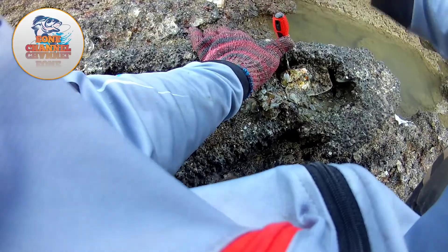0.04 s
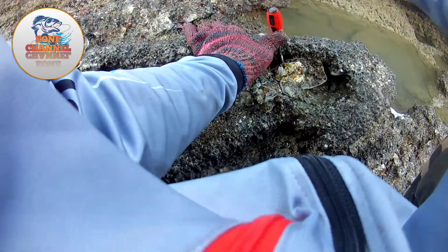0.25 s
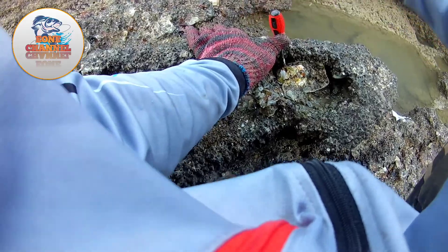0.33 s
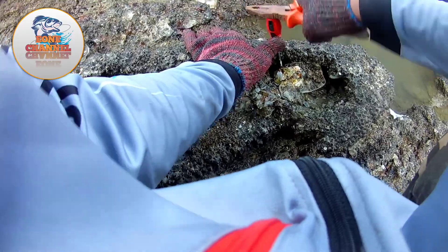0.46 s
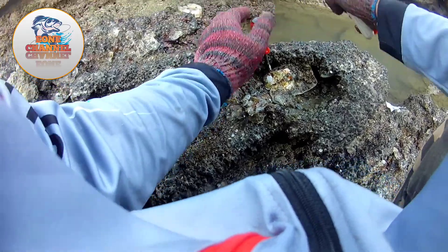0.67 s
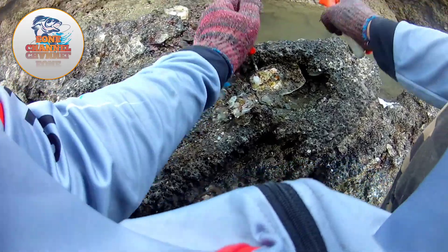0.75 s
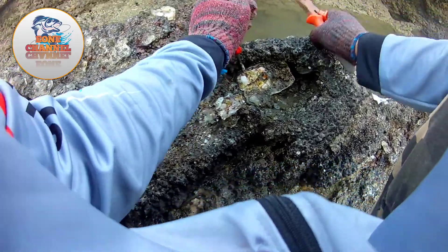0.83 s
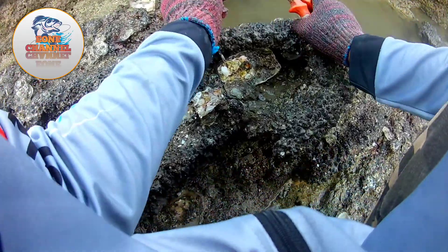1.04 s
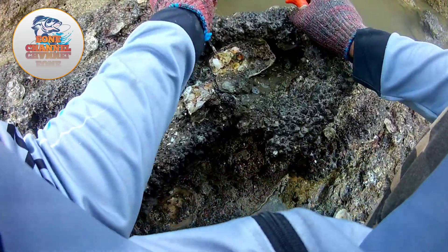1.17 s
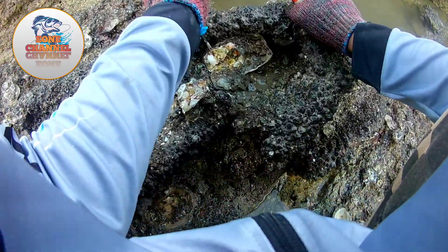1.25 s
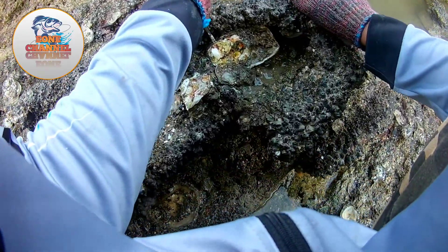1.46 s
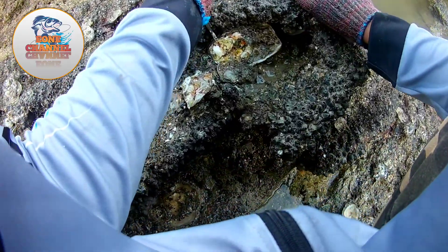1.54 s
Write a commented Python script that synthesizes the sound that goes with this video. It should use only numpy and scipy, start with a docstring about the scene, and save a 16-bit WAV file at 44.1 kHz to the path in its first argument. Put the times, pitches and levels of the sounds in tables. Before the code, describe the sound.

Two sharp, close knocks of a tool on shell, with wind and water rumbling behind.

```python
"""Wind and water rumble on a shore. A hand tool knocks twice on an oyster fixed to a rock, close enough
to overload the microphone: each impact excites damped modes of shell and tool and scatters off the rocks.
Between the blows a bubble resonates in a pool with a plip. Afterwards a faint high rasp and a faint hum
come and go, a few more bubbles ring, and the tool's tip ticks lightly on the shell."""
import sys
import numpy as np
from scipy import signal
from scipy.fft import rfft, irfft
from scipy.io import wavfile
from scipy.ndimage import map_coordinates

SR = 44100
rng = np.random.default_rng(int(sys.argv[2]) if len(sys.argv) > 2 else 0)


def unload_audio(sound):
    """Save the sound as a 16-bit wav file, at the path given as the first command line argument."""
    columns = np.transpose(np.atleast_2d(sound))
    # keep every value between -1 and 1, then stretch to whole-number steps
    steps = np.round(np.clip(columns, -1, 1) * 32767)
    wavfile.write(sys.argv[1], SR, steps.astype(np.int16))


N = 70560
TIME = np.arange(N) / SR


def amp(db):
    """Amplitude ratio of a level in decibels."""
    return 10 ** (np.asarray(db) / 20)


def unit(x):
    """Normalisation to rms 1."""
    return x / np.sqrt(np.mean(x ** 2) + 1e-20)


def along(points, hz):
    """Interpolation on a logarithmic frequency axis."""
    freqs, values = np.transpose(points)
    return np.interp(np.log(hz + 1), np.log(freqs + 1), values)


def level(points):
    """Gain envelope, interpolated in decibels."""
    return amp(np.interp(TIME, *np.transpose(points)))


def filtered(x, response):
    """Zero-phase filtering by a frequency response."""
    mirrored = np.concatenate([x, x[::-1]])
    hz = np.fft.rfftfreq(len(mirrored), 1 / SR)
    return irfft(rfft(mirrored) * response(hz))[:len(x)]


def noise(spectrum):
    """Spectrally shaped noise of rms 1."""
    return unit(filtered(rng.standard_normal(N), lambda hz: amp(along(spectrum, hz))))


def wobble(rate):
    """Smooth random modulation, with rate knots a second."""
    return map_coordinates(rng.standard_normal(N // 8), [TIME * rate], mode="mirror")


def since(start):
    """Seconds elapsed since start, zero before."""
    return np.maximum(TIME - start, 0)


def fade(t, rise, t60):
    """Exponential rise and decay; t60 is the time to fall 60 dB."""
    return (1 - np.exp(-t / rise)) * np.exp(-np.log(1000) * t / t60)


def tilt(hz, db_per_octave, pivot_hz=1500):
    """Spectral slope about a pivot sets the brightness."""
    return amp(db_per_octave * np.log2(np.maximum(hz, pivot_hz / 2) / pivot_hz))


# Spectra of wash and buffeting. Each row: frequency in Hz, relative level in dB.
WASH_SPECTRUM = [(20, -1.5), (45, 0), (80, -2.5), (125, 1.5), (160, -3), (260, -3.5), (310, -4.5),
                 (390, -3.5), (560, -8), (750, -9.5), (1050, -12), (1600, -25.5), (2200, -36), (3200, -43),
                 (4000, -45.5), (6000, -52.5), (9000, -69.5)]
BUFFET_SPECTRUM = [(15, -3), (35, -6.5), (70, 2), (120, -2), (200, -11.5), (600, -48.5), (2000, -120)]
# Their envelopes. Each row: time in seconds, level in dB.
WASH_LEVELS = [(0, -46.5), (0.25, -44), (0.55, -43), (0.72, -44.5), (0.95, -44), (1.15, -41), (1.35, -45),
               (1.6, -45)]
BUFFET_LEVELS = [(0, -56.5), (0.2, -52.5), (0.3, -57), (0.38, -56), (0.5, -46), (0.6, -54.5), (0.71, -45.5),
                 (0.9, -53), (1.1, -52), (1.25, -54), (1.42, -43), (1.5, -52), (1.6, -51.5)]
def shore(swing_db=4):
    """Turbulence: wind and water make a low wash, and pressure fluctuations buffet the microphone."""
    wash = level(WASH_LEVELS) * amp(0.2 * wobble(7.6)) * noise(WASH_SPECTRUM)
    buffeting = unit(noise(BUFFET_SPECTRUM) * amp(swing_db * wobble(28)))
    return wash + level(BUFFET_LEVELS) * buffeting


# Spectrum of the contact. Each row: frequency in Hz, relative level in dB.
CRACK_SPECTRUM = [(200, -5), (1400, 8.5), (2500, -10), (3200, -23.5), (5500, -15.5), (7000, -20.5),
                  (8500, -34), (15000, -37)]
def crack(start, lead_s=0.00045):
    """A brief contact is broadband: a first touch, then the brittle crack of the full blow."""
    touch = amp(-16.5) * noise(CRACK_SPECTRUM) * fade(since(start - lead_s), rise=0.00015, t60=0.001)
    return touch + amp(-7) * noise(CRACK_SPECTRUM) * fade(since(start), rise=0.0004, t60=0.0087)


# Spectrum of the rock under the shell. Each row: frequency in Hz, relative level in dB.
THUD_SPECTRUM = [(25, -9), (60, -5), (115, -4), (200, -11.5), (320, 2), (400, -6.5), (520, 2), (650, -2),
                 (900, -15), (2000, -46)]
def thud(start):
    """Transmission of the impact into the rock gives a dull, damped burst."""
    return noise(THUD_SPECTRUM) * fade(since(start), rise=0.0013, t60=0.067)


# Modes of shell and tool. Each row: frequency in Hz, level in dB, t60 in seconds.
SHELL_MODES = [(103.7, -23.5, 0.045), (289.45, -26.5, 0.016), (652.3, -5.5, 0.02), (735.6, 0.5, 0.031),
               (1013, -23.5, 0.081), (1385, -3, 0.025), (1645, -2, 0.015), (1986, 0.5, 0.024),
               (2466, -4.5, 0.013), (2742, -20, 0.017), (3566, -20, 0.023), (4725, -25, 0.025),
               (5680, -26.5, 0.015), (6200, -27.5, 0.02)]
def ring(start, pitch, length, slope):
    """Free vibration is a sum of damped modes, here with neighbours in opposite phase."""
    t, out = since(start), np.zeros(N)
    for k, (hz, db, t60) in enumerate(SHELL_MODES):
        hz = hz * pitch * (1 + 0.002 * rng.standard_normal())
        envelope = amp(db) * tilt(hz, slope) * fade(t, rise=0.0013, t60=t60 * length)
        out += (-1) ** k * envelope * np.sin(2 * np.pi * hz * t)
    return out


# Spectrum of the echo. Each row: frequency in Hz, relative level in dB.
ECHO_SPECTRUM = [(80, -19), (400, -8), (750, -2.5), (1030, 1), (2000, -3.5), (2700, -10.5), (3200, -22.5),
                 (5000, -20), (7000, -43), (8000, -58), (12000, -62)]
# Its decay. Each row: frequency in Hz, t60 in seconds.
ECHO_DECAY = [(200, 0.1), (1000, 0.1), (2000, 0.066), (5000, 0.052), (10000, 0.04)]
def rock_echo(start, rise_s=0.001):
    """Diffuse scattering from rough rocks leaves a tail whose treble dies first."""
    hz, t, spectrogram = signal.stft(noise(ECHO_SPECTRUM), SR, nperseg=256)
    decay = np.exp(-np.log(1000) * np.maximum(t - start, 0) / along(ECHO_DECAY, hz)[:, None])
    tail = signal.istft(spectrogram * decay, SR, nperseg=256)[1][:N]
    return tail * (1 - np.exp(-since(start) / rise_s))


# Blows of the tool. Each row: start in seconds, gain in dB, pitch ratio, ring length ratio,
# echo gain in dB, ring slope in dB per octave, thud gain in dB.
TOOL_BLOWS = [(0.1141, 1.5, 0.992, 0.89, -17, -1.45, -30), (0.4230, 0, 1.01, 0.99, -15.5, 0.74, -20)]
def knocks():
    """Impact excitation: the crack, thud, ring and echo of each blow superpose."""
    out = np.zeros(N)
    for start, db, pitch, length, echo_db, slope, thud_db in TOOL_BLOWS:
        direct = crack(start) + amp(thud_db) * thud(start) + ring(start, pitch, length, slope)
        out += amp(db) * (direct + amp(echo_db) * rock_echo(start))
    return out


# Bubbles in the pool. Each row: start in seconds, initial frequency in Hz, level in dB, t60 in seconds.
BUBBLES = [(0.235, 733, -33, 0.058), (0.824, 1074, -31.5, 0.033), (1.4712, 932, -32.5, 0.091),
           (1.4768, 1089, -25, 0.023)]
def plips(glide_per_s=3.1):
    """Bubble resonance: trapped air pulsates as a damped oscillator, rising in pitch."""
    out = np.zeros(N)
    for start, hz, db, t60 in BUBBLES:
        t = since(start)
        phase = 2 * np.pi * hz * t * (1 + glide_per_s * t / 2)
        out += amp(db) * fade(t, rise=0.0015, t60=t60) * np.sin(phase)
    return out


# Swells of a faint high rasp. Each row: centre in seconds, half length in seconds, level in dB.
RASP_SWELLS = [(0.565, 0.057, -75), (0.971, 0.048, -64), (1.145, 0.046, -73.5), (1.558, 0.028, -71)]
# Their spectrum. Each row: frequency in Hz, relative level in dB.
RASP_SPECTRUM = [(1000, -5), (2500, 1.5), (3300, -15.5), (3700, -0.5), (3950, 1), (4300, -11), (6400, -25),
                 (8000, -35)]
def rasps(roughness_db=3):
    """Fast random amplitude modulation roughens noise with peaks near 2.5 and 4 kHz into a rasp."""
    envelope = sum(amp(db) * np.exp(-((TIME - centre) / half) ** 2) for centre, half, db in RASP_SWELLS)
    return envelope * unit(noise(RASP_SPECTRUM) * amp(roughness_db * wobble(230)))


# Swells of hum. Each row: centre in seconds, half length in seconds, frequency in Hz, rms level in dB.
HUM_SWELLS = [(0.588, 0.032, 380.6, -44), (0.903, 0.025, 368, -47), (0.942, 0.059, 423.5, -48.5),
              (1.21, 0.25, 250.1, -56.5)]
def hum(waver=0.02):
    """Random frequency modulation makes faint tones waver as they swell and fade."""
    out = np.zeros(N)
    for centre, half, hz, db in HUM_SWELLS:
        envelope = amp(db) * np.exp(-((TIME - centre) / half) ** 2)
        phase = 2 * np.pi * np.cumsum(hz * (1 + waver * wobble(40.04))) / SR
        out += envelope * np.sqrt(2) * np.sin(phase)
    return out


# Touches of the tip. Each row: start in seconds, gain in dB, slope in dB per octave.
TOUCHES = [(0.996, -41.5, -5), (1.1033, -37, 2), (1.128, -61, 5.5), (1.154, -59, 2), (1.226, -55.5, 3.5),
           (1.256, -59.5, 2), (1.54, -52, -9), (1.551, -59, -7.5)]
# Their spectrum before the slope. Each row: frequency in Hz, relative level in dB.
TICK_SPECTRUM = [(500, -17), (1100, 0), (1650, 11), (2400, -5), (3000, -14), (4200, -2.5), (5500, -27),
                 (6500, -8), (7100, -28), (15000, -42)]
def ticks():
    """Impact transients: light ticks on the shell, each with its own level and brightness."""
    out = np.zeros(N)
    for start, db, slope in TOUCHES:
        contact = filtered(noise(TICK_SPECTRUM), lambda hz: tilt(hz, slope))
        out += amp(db) * fade(since(start), rise=0.00036, t60=0.016) * contact
    return out


def scene():
    """Superposition of the tool's sounds and their surroundings at one microphone."""
    tool = knocks() + ticks()
    return (tool + rasps() + shore() + plips() + hum())[None]


# Microphone response and self-noise. Each row: frequency in Hz, relative level in dB.
MIC_RESPONSE = [(6800, 0.5), (7600, -2), (7950, -18), (8500, 0), (12500, 0.5), (13500, -7), (15800, -6)]
HISS_SPECTRUM = [(100, -5.5), (3000, 1), (8000, 0.5), (15800, 0.5)]
def record(dry, ceiling=0.96, knee=7, top_hz=15850):
    """Saturation rounds the peaks; the microphone colours the treble, hisses and limits the band."""
    saturated = dry[0] / (1 + np.abs(dry[0] / ceiling) ** knee) ** (1 / knee)
    coloured = filtered(saturated, lambda hz: amp(along(MIC_RESPONSE, hz)))
    hiss = amp(-80) * noise(HISS_SPECTRUM)
    return filtered(coloured + hiss, lambda hz: hz < top_hz)[None]


dry = scene()
out = record(dry)
unload_audio(out)
```